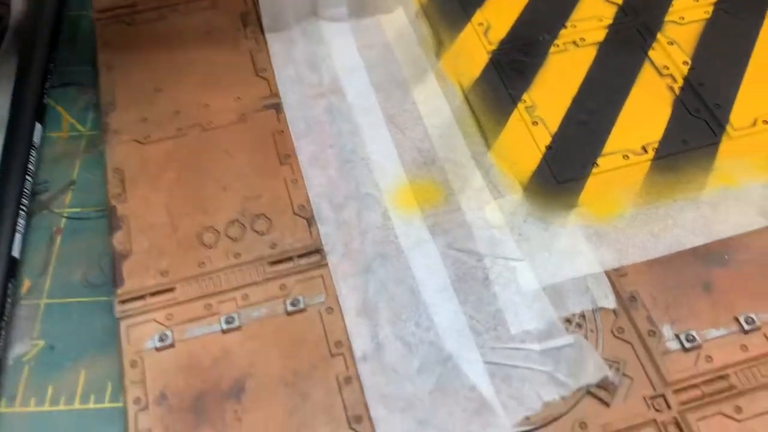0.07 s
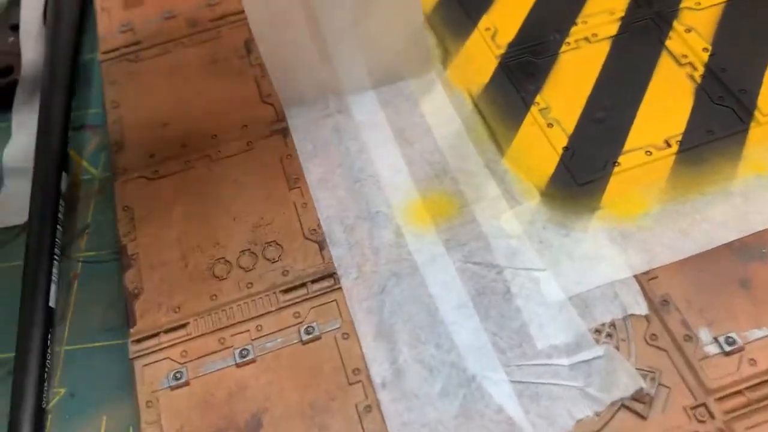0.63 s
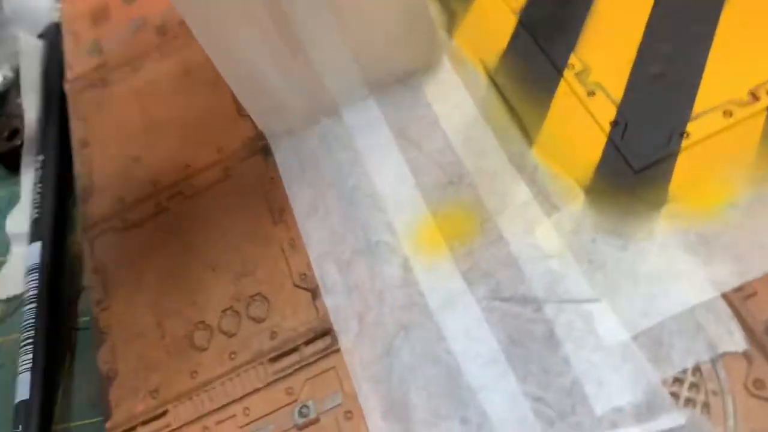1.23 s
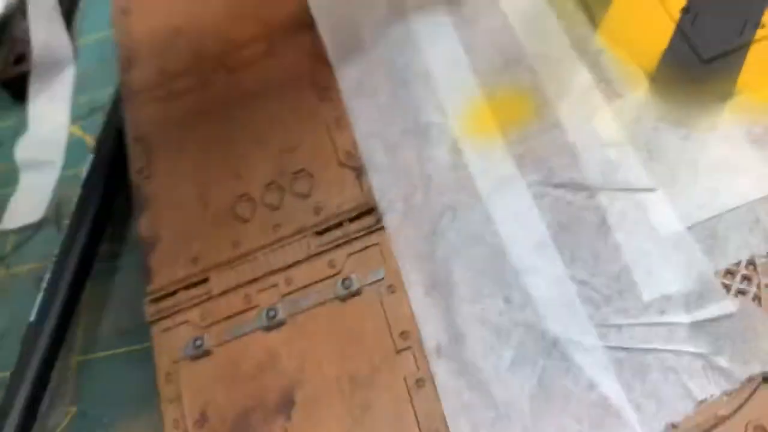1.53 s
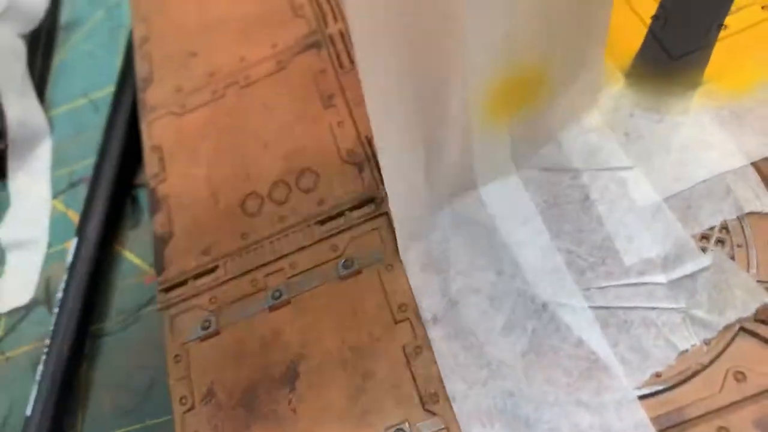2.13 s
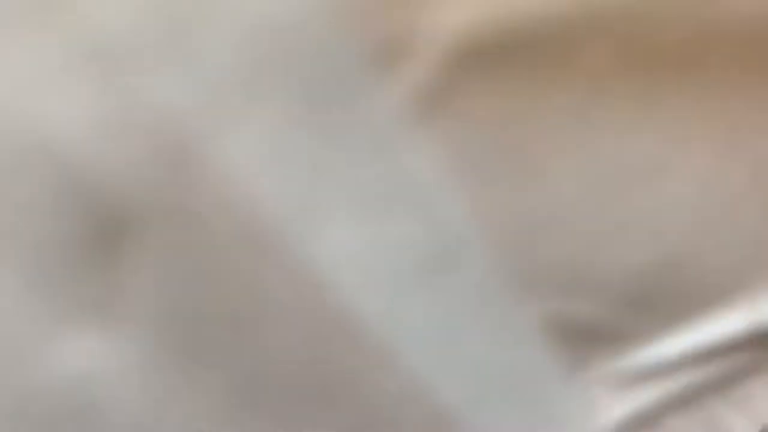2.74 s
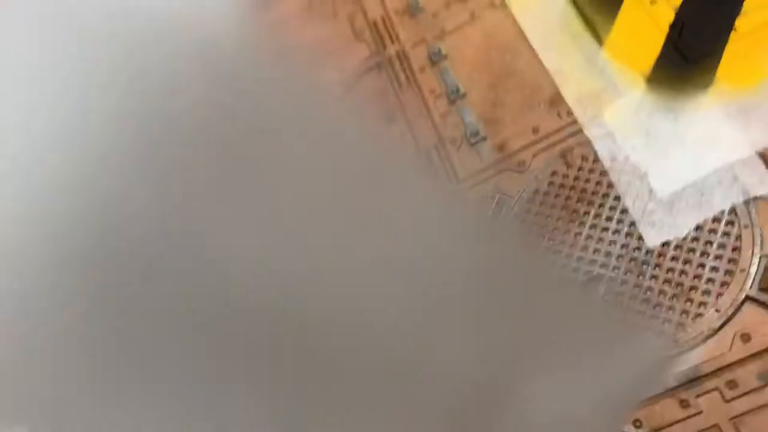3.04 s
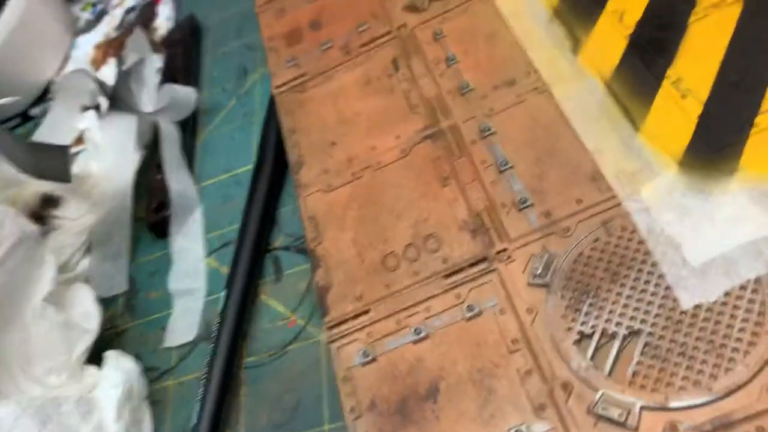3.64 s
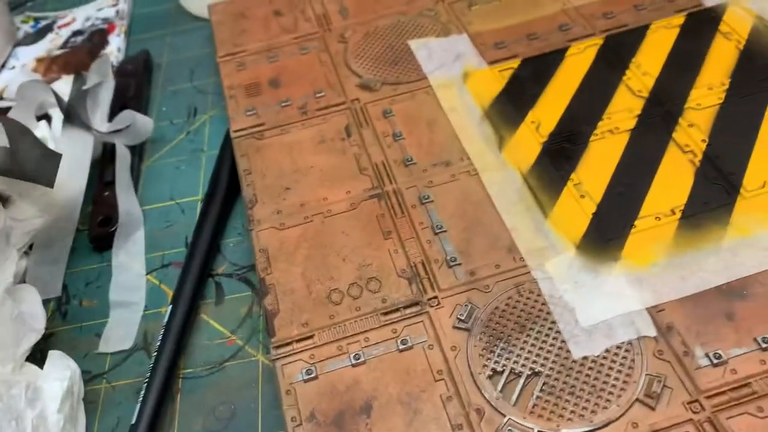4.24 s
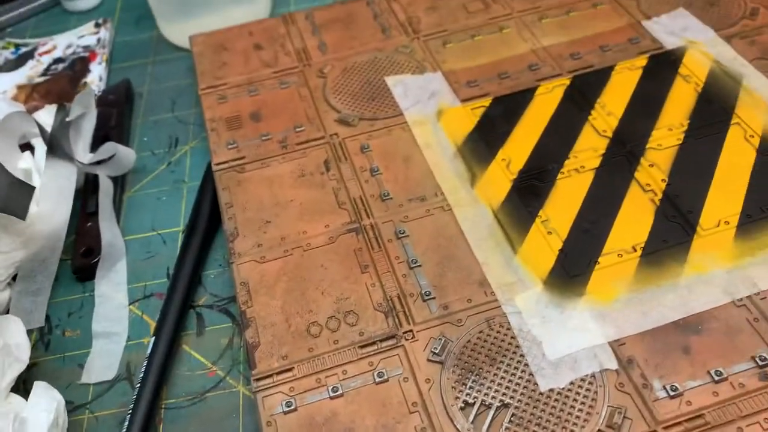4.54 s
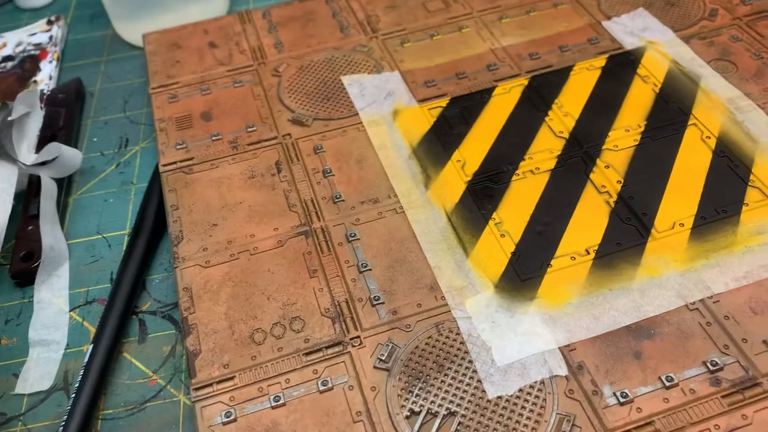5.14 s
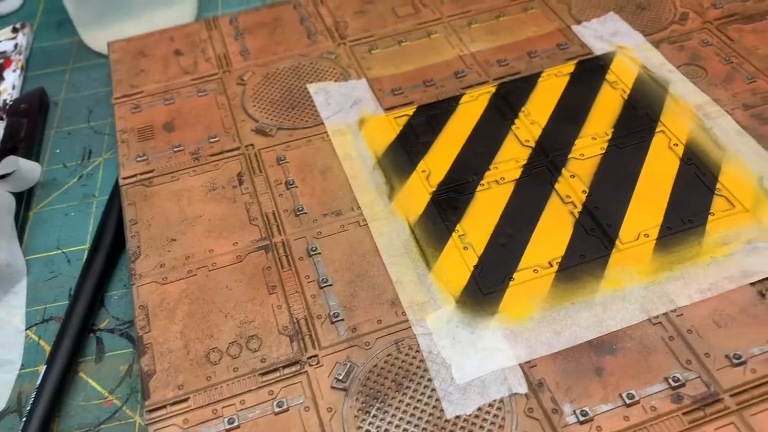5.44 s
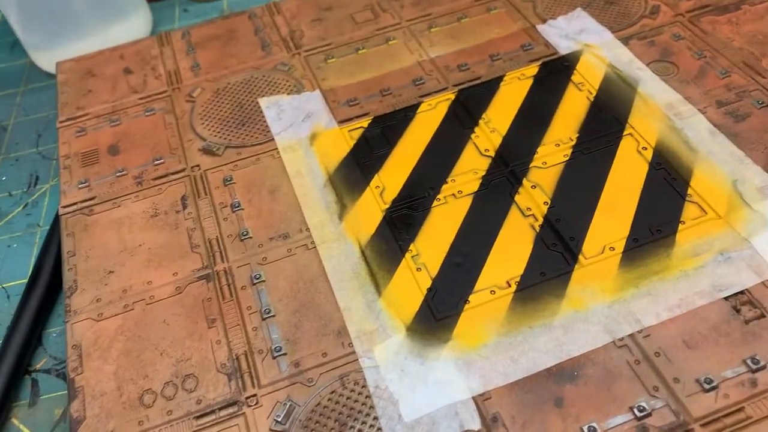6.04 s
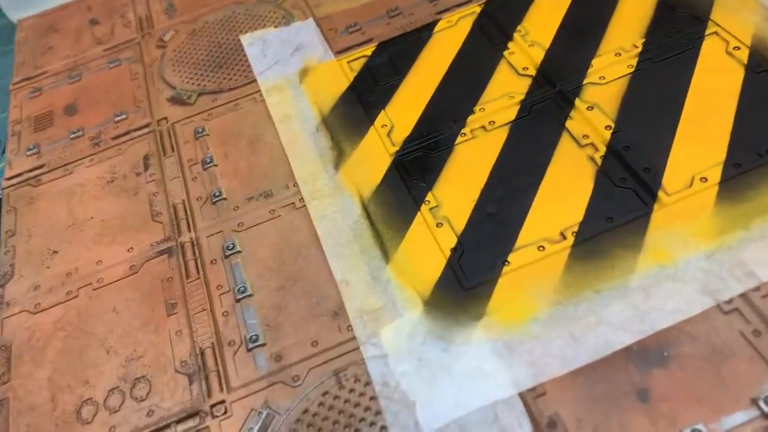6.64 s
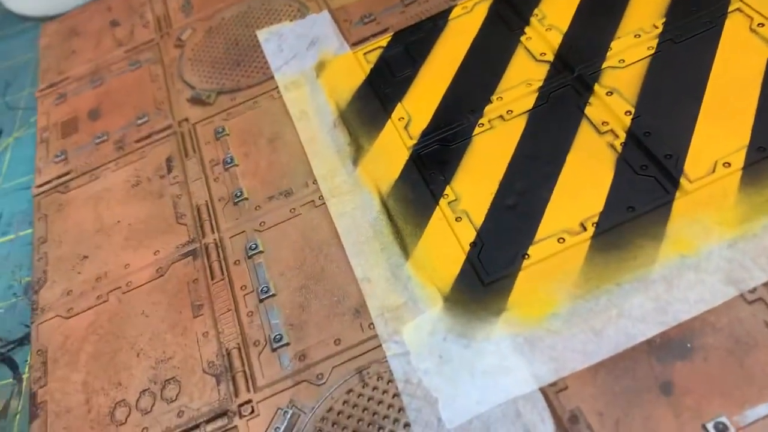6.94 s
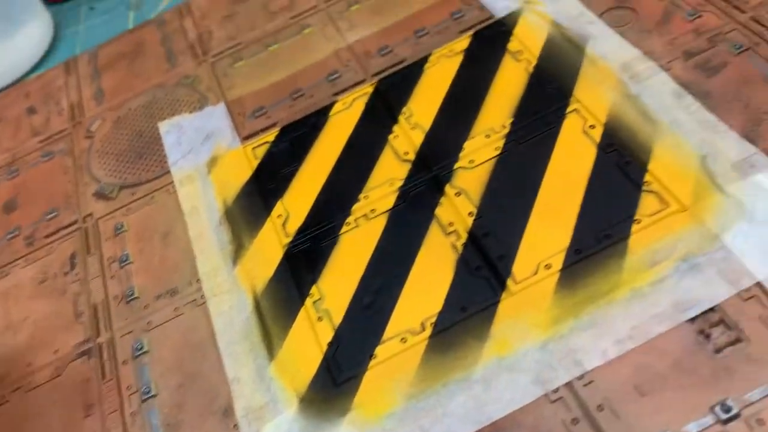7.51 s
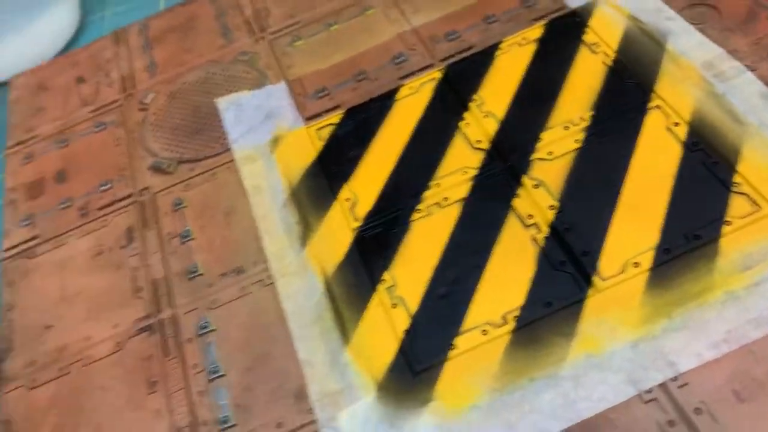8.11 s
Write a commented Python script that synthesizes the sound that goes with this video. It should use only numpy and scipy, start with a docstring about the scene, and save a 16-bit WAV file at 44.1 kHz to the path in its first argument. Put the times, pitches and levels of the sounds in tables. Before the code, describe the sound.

Close to a pair of microphones in a small, dry room, masking tape comes away from a board in uneven, sticky rips that build in strength. It lets go with a low thump, and after a short pause the strip flaps with a sharp slap. Lighter crumpling and ticking of the paper follow. Near the end come quiet fingertip rubs, a tiny squeak and a few light, hollow taps on the board.

```python
"""Wide masking tape is pulled off a painted board: the glue crackles, the tight paper flutters and the
board rings. The strip rips free with a low twang, slaps past two close microphones, then rustles as
it is put aside. Fingers then slide over the board and tap it, in a small, dry room.
Most sounds are noise shaped in loudness and tone; thumps and clear rings are fading sine waves."""
import sys
import numpy as np
from scipy import signal
from scipy.fft import rfft, irfft, next_fast_len
from scipy.io import wavfile
from scipy.ndimage import map_coordinates

SR = 44100
rng = np.random.default_rng(int(sys.argv[2]) if len(sys.argv) > 2 else 0)


def output_pcm(signal):
    """Save a mono or channel-first signal as 16-bit PCM at the path in sys.argv[1].

    Samples are clipped to [-1, 1] before scaling.
    """
    pcm = np.clip(np.atleast_2d(signal).T, -1, 1) * 32767
    wavfile.write(sys.argv[1], SR, np.round(pcm).astype(np.int16))


N = 369116

# Levels are relative within each layer. t is the start time; t60 is the time to fade by 60 dB.
# Pulls on the tape: t/s, length/s, crackle/dB, rasp/dB, flutter/dB
PULLS = [(0, 0.087, -45, -56, -45.5), (0.175, 0.0079, -39.5, -48, -42), (0.213, 0.032, -51.5, -52, -49),
         (0.259, 0.063, -45.5, -45, -41), (0.318, 0.039, -41.5, -68, -52), (0.382, 0.054, -45, -63.5, -61),
         (0.487, 0.062, -39, -41.5, -38.5), (0.594, 0.05, -47, -51.5, -44.5),
         (0.75, 0.057, -59, -64.5, -58), (0.858, 0.017, -61, -46.5, -37), (0.932, 0.11, -55, -59, -42.5),
         (1.146, 0.11, -62, -65.5, -56), (1.218, 0.04, -48.5, -43, -50.5),
         (1.262, 0.059, -41.5, -40.5, -28), (1.31, 0.12, -78, -54.5, -32.5),
         (1.521, 0.098, -39, -38.5, -31), (1.659, 0.052, -38, -38.5, -28.5),
         (1.885, 0.02, -35.5, -34.5, -28), (1.986, 0.059, -39.5, -42.5, -28.5),
         (2.062, 0.019, -34.5, -35.5, -24.5), (2.141, 0.05, -33.5, -39.5, -29),
         (2.222, 0.044, -37, -42, -31), (2.308, 0.0085, -35, -41, -23), (2.368, 0.076, -30, -35.5, -21.5),
         (2.489, 0.0056, -34, -36, -23), (2.494, 0.0079, -26.5, -32.5, -20),
         (2.537, 0.016, -42.5, -33, -22), (2.596, .016, -58.5, -47, -36.5),
         (2.885, 0.027, -62.5, -66, -69.5), (3.104, 0.025, -57, -41.5, -35)]
# Tugs that make the tight tape creak: t/s, length/s, level/dB, f/Hz
CREAKS = [(.01, 0.074, -57.5, 1680), (.18, .025, -51, 1650), (.264, 0.027, -40, 1560),
          (.304, 0.0073, -40, 1750), (.36, 0.11, -65.5, 1650), (.49, 0.046, -50, 1820),
          (.49, .07, -50, 480), (.862, 0.013, -46, 1900), (.862, 0.023, -52, 480), (.972, .004, -49, 1450),
          (1.233, .008, -47.5, 1600), (1.383, 0.0098, -48, 1883), (1.555, 0.0066, -22.5, 1514),
          (7.69, 0.016, -51, 1700)]
# The loudest snaps of glue, creases and fingernails: t/s, level/dB, papery body against that level/dB
SNAPS = [(.002, -24, -8), (.112, -39, 3), (.1605, -17.5, -2), (.184, -16.5, -10), (.2778, -31, 0),
         (.2932, -23.5, -13), (.4773, -29, -6), (.4895, -39, 3), (.5482, -20.5, -0.5), (.5656, -19.5, -3.5),
         (.6444, -20, -25), (.8595, -35, 6.5), (1.0096, -32, -15), (1.2196, -30, -0.5), (1.232, -31, 2.5),
         (1.2595, -29.5, -8), (1.4676, -26, 1.5), (1.5065, -19, -0.5), (1.5259, -27, -18),
         (1.5474, -11.5, -2.5), (1.5853, -17, -5), (1.6586, -19, -8), (1.6705, -24, 0.5), (1.7434, -27, 6),
         (1.8777, -23.5, -5), (1.951, -27, 3), (2.0123, -29, -3.5), (2.0318, -20.5, -1), (2.072, -20, -1),
         (2.0777, -15.5, 2), (2.085, -22.5, -4), (2.1211, -17, -8.5), (2.172, -12, -17), (2.2408, -18, -10),
         (2.3117, -20, 1), (2.3491, -23.5, -8), (2.3626, -20, -11), (2.392, -20, -12),
         (2.4415, -7.5, -15.5), (2.4962, -11, -20), (2.504, -11.5, -18.5), (2.5095, -14, -18),
         (2.5556, -5, -19.5), (2.5592, -13.5, -17), (2.9058, -26, -12), (2.9445, -34, -24.5),
         (2.955, -6, -1), (2.9665, -9, -0.5), (2.9806, -18.5, 8), (3.0345, -29.5, 2), (3.0714, -34, 7),
         (3.0975, -33, 17), (3.121, -42, 10), (3.1617, -42, 15.5), (3.2286, -31.5, -12), (3.5955, -17, 0.5),
         (3.8166, -23.5, -19.5), (3.8355, -24.5, -15.5), (3.857, -30, -3.5), (3.9223, -33, -3),
         (3.9318, -22.5, -15), (3.9495, -23, -11.5), (3.9727, -29, 1), (4.1014, -5.5, -6), (4.2808, -28, 2),
         (4.296, -32, 8), (4.3074, -21.5, 9.5), (4.4237, -21, -5), (4.4334, -20, -7.5), (4.5699, -39, 5.5),
         (4.6302, -23.5, -11), (4.6606, -20.5, -8), (4.6981, -22.5, -16), (4.8911, -35.5, 4),
         (5.1361, -26.5, -20), (5.1565, -42, -12), (5.189, -38, -10), (5.3127, -31, -19),
         (5.3376, -26.5, -1), (5.3626, -30, 0), (5.627, -26.5, -17.5), (5.8, -33.5, -19), (6.7312, -27, 4),
         (6.9155, -39, -6.5), (7.1755, -16.5, -4), (8.1435, -35.5, -5.5), (8.2585, -37, -12)]
# The freed strip slaps and bounces: t/s, level/dB, t60/s
SLAPS = [(2.956, -14, 0.043), (2.9805, -5, 0.052), (3.099, -20.5, 0.062), (3.1615, -31.5, 0.11)]
# Low thumps of the tape and the board: t/s, level/dB, f/Hz, t60/s
THUMPS = [(.291, -20.5, 66, 0.07), (.95, -23.5, 69, 0.057), (1.304, -15.5, 860, 0.0063),
          (1.307, -12, 241, 0.043), (1.316, -6.5, 108, 0.037), (1.335, -27, 70, 0.27),
          (1.335, -31, 194, 0.13), (1.908, -18.5, 210, 0.04), (2.087, -19, 78, 0.072),
          (2.176, -22.5, 120, .12), (2.262, -23, 115, 0.13), (2.458, -21, 90, .05),
          (2.576, -3, 230.8, 0.016), (2.6, -32, 242, 0.11), (2.586, -15.5, 113, 0.095),
          (2.607, -10.5, 57.45, 0.27), (2.912, -26.5, 138, 0.05), (2.983, -13, 136, 0.07),
          (2.991, -17, 70.7, 0.31), (5.208, -47.5, 200, 0.072), (5.235, -46.5, 170, .07),
          (5.801, -53, 298, 0.051), (6.918, -49, 230, 0.062), (6.743, -21, 79.3, 0.075),
          (7.187, -38, 213, 0.086), (7.312, -49, 148, 0.089), (7.741, -41, 140, 0.078),
          (8.155, -34.5, 79.9, 0.095), (8.29, -44.5, 130, 0.093)]
# Squeezes of the loose strip: t/s, length/s, rustle/dB, rasp/dB
SQUEEZES = [(3.24, 0.042, -63, -73.5), (3.36, 0.018, -61.5, -86.5), (3.54, 0.025, -53, -65),
            (3.575, 0.038, -45.5, -60), (3.63, 0.037, -58.5, -61), (3.72, 0.026, -59.5, -69),
            (3.828, 0.061, -48.5, -64), (3.925, 0.084, -51, -65), (4.06, .02, -55, -55.5),
            (4.092, 0.032, -46, -49.5), (4.165, 0.054, -47.5, -56), (4.295, 0.026, -34.5, -46),
            (4.34, 0.048, -43.5, -58.5), (4.45, 0.081, -58.5, -69), (4.576, 0.03, -56, -64),
            (4.665, 0.042, -43, -55.5), (4.775, 0.017, -52.5, -61.5), (4.89, 0.067, -50, -59),
            (5.01, 0.036, -49.5, -62), (5.055, 0.023, -44, -55.5), (5.14, 0.17, -58, -63.5),
            (5.315, 0.08, -52, -56.5), (5.44, 0.069, -57, -65), (5.605, 0.021, -50.5, -54)]
# Runs of buckling creases: t/s, length/s, level/dB
CRINKLES = [(3.588, 0.014, -39), (3.83, .015, -45.5), (3.857, .012, -37), (3.922, 0.019, -41.5),
            (4.322, 0.019, -37), (4.423, 0.012, -37), (4.662, .012, -41.5), (4.698, .008, -43),
            (5.07, .014, -43), (5.11, .09, -58), (5.305, .01, -50), (5.364, 0.0048, -36.5),
            (5.44, .004, -47), (5.46, 0.043, -64), (5.612, .004, -46.5)]
# Blows that ring the board: t/s, level/dB, t60/s
KNOCKS = [(.282, -29.5, 0.022), (.711, -43.5, 0.022), (.744, -38.5, 0.058), (.832, -36, 0.042),
          (.876, -36, .04), (.972, -41, .03), (1.009, -34.5, 0.057), (1.261, -20.5, 0.047),
          (1.303, -32, 0.042), (1.344, -30.5, 0.1), (1.38, -27, 0.015), (1.549, -17.5, 0.08),
          (1.588, -21.5, 0.088), (1.827, -31.5, 0.11), (2.012, -18.5, 0.017), (2.44, -19.5, 0.079),
          (2.49, -29, 0.17), (2.555, -17, 0.043), (4.103, -24.5, 0.025), (4.306, -26, 0.04),
          (5.801, -58, 0.18), (6.499, -40.5, 0.059), (6.541, -47, 0.052), (6.613, -36, 0.04),
          (6.631, -35, 0.029), (6.731, -23, 0.11), (6.757, -32, 0.046), (6.797, -41.5, 0.077),
          (6.917, -49, 0.041), (7.178, -26, 0.043), (7.308, -46.5, 0.072), (8.143, -38.5, 0.059)]
# Small touches that give one clear ring: t/s, level/dB, f/Hz, t60/s
PINGS = [(1.549, -27.5, 1258, 0.1), (1.55, -24, 1475, 0.077), (1.55, -33.5, 805, .16),
         (5.441, -54, 754, 0.055), (5.497, -50, 746, .06), (5.63, -52.5, 750, 0.2), (5.801, -52, 694, 0.09),
         (5.801, -61.5, 770, .16), (6.918, -44.5, 6180, 0.028), (6.918, -50, 7730, 0.017),
         (6.917, -51, 3700, 0.017), (7.176, -16, 2850, 0.015)]
# Fingers sliding on the board: t/s, length/s, hiss/dB, rub/dB, rumble/dB
SLIDES = [(6.33, 0.045, -68.5, -64, -81), (6.385, 0.024, -60.5, -58, -71.5), (6.43, 0.014, -76, -58.5, -59),
          (6.502, 0.067, -68, -56, -63.5), (6.618, 0.021, -62, -46.5, -57.5),
          (6.685, 0.043, -63, -49.5, -55.5), (6.735, 0.018, -56, -35.5, -40.5),
          (6.935, 0.07, -61.5, -56, -59.5), (7.02, 0.09, -64, -61, -87.5), (7.165, 0.035, -58, -42, -49),
          (7.31, 0.056, -73.5, -86, -67), (7.687, 0.0092, -55.5, -41.5, -57),
          (7.74, 0.0084, -58.5, -76, -52.5), (7.79, 0.1, -65, -71.5, -84),
          (8.147, 0.057, -56.5, -61, -57.5), (8.258, 0.0056, -51.5, -55, -65), (8.3, 0.1, -71, -55.5, -59)]
# A fingertip catching on the paint: t/s, length/s, level/dB, f/Hz
CATCHES = [(6.5, 0.011, -58, 2100), (6.613, 0.026, -49, 1377), (6.614, 0.02, -52.5, 2250),
           (6.692, 0.017, -52, 2400), (6.706, 0.026, -43, 1430), (6.711, 0.041, -41.5, 1750),
           (6.733, 0.034, -51, 845)]
# The pitches at which the board rings: f/Hz, width/Hz, level/dB
BOARD_RINGS = [(540, 98, -9.5), (857, 14, -7), (1134, 87, -5), (1217, 160, 6.5), (1440, 39, -8.5),
               (1646, 18, -6), (1594, 100, -3), (1870, 20, -10.5), (2430, 17, -5), (2910, 210, -9.5)]

# The tone of each sound, from bass to treble: f/Hz, level/dB
GLUE_TONE = [(900, -44.5), (2000, -15.5), (3000, -5.5), (4200, 2), (5500, 2.5), (7600, 0), (8300, 6),
             (11500, 1.5), (14000, 4), (15800, -11)]
FLUTTER_TONE = [(22, -44), (45, -0.5), (75, 4.5), (140, 0.5), (220, -1), (330, -6), (500, -14.5),
                (900, -23.5), (2500, -54)]
TAPE_DAMPING = [(400, 0.5), (750, -1), (1700, 1), (2100, -1), (2500, -4.5), (3100, -1.5), (4200, 0.5),
                (9000, 0)]  # stuck-down tape dulls the board's rasp
SNAP_TOP_TONE = [(2500, -11.5), (5000, -5), (7500, 0.5), (9000, 0), (10800, 3), (13400, 0.5), (16000, -7)]
SNAP_BODY_TONE = [(600, -28.5), (1800, -12.5), (2800, -3.5), (4500, 0), (7000, -9.5), (12000, -35)]
PAPER_TONE = [(900, -20.5), (2000, 3.5), (2600, 5), (3000, -4), (3500, 4), (4200, 5.5), (5400, -1.5),
              (6400, 6), (7400, -1.5), (8300, 0.5), (10200, 1), (11900, 1.5), (13200, 4), (14700, -4),
              (15800, -13)]
PAPER_BODY_TONE = [(120, -4), (240, 3.5), (450, 6), (760, 8), (1000, 6), (1300, 8), (1900, -1.5),
                   (2700, -9.5), (4500, -21.5), (9000, -39.5)]
BOARD_RASP_TONE = [(200, -26), (450, 1), (850, 5), (1000, 0.5), (1250, -2.5), (2000, 2.5), (2800, 0.5),
                   (4500, -7.5), (9000, -17.5), (15500, -36.5)]
SKIN_TONE = [(1200, -8.5), (2700, 4.5), (4200, -6.5), (5500, -5), (7200, -2.5), (8300, -1), (10000, -4.5),
             (13500, -3), (15800, -19)]
BACKGROUND_TONE = [(25, -4.5), (55, 9), (120, 3), (300, 2), (800, -13), (2000, -15), (4200, -17),
                   (7000, -21), (11000, -23), (16000, -32)]

# How each source reaches the microphones: f/Hz, left minus right/dB, left ahead by/radians
PEEL_EDGE_AIM = [(1300, 0, .3), (2000, 0, 3), (3000, 0, 4.1), (4200, 1.5, 6.2), (5300, -1.5, 3.2),
                 (6200, 0, 6.1), (8000, 0, 10), (9600, 0, 8.62)]
STRIP_AIM = [(450, -1.5, 0.011), (700, 0, -0.067), (1500, -1, -0.18), (3100, 0, -0.34), (3980, 7.5, -0.048),
             (5400, -1.5, 0.01), (7040, -0.5, 0.035)]
BOARD_AIM = [(250, -2.5, 0.32), (480, 0, 0.13), (784, 0.5, 0.14), (1300, -0.5, 0.63), (1758, -2, 2.5),
             (2600, -0.5, 2), (4600, 2.5, 7.8), (7300, -0.5, 8.1)]
# How alike left and right are: f/Hz, likeness (1 = the same)
LIKENESS = [(60, 1), (250, 0.88), (600, 0.62), (1500, 0.35), (5000, 0.24), (15000, 1)]
# How the two microphones differ in tone: f/Hz, left minus right/dB
LEFT_BIAS = [(120, 2), (250, 2), (600, 4), (1000, 3.5), (2000, 0), (4000, -.5), (5600, -3.5), (7400, 0.5),
             (8200, -8), (9500, 0)]
# How long the room echoes: f/Hz, t60/s
ROOM_DECAY = [(80, .25), (500, 0.36), (3000, 0.18), (12000, 0.42)]

PUT_ASIDE_S = 3.2  # from here on the strip lies on the left
STRIP_LEAD_S, SLAP_LEAD_S = .00036, -.00017  # head start of the left microphone; negative: the right


def peel(crackle_gain, rasp_gain, flutter_gain):
    """Glue threads stick and let go in clumps, which also rasp the board and pluck the tight tape."""
    slips = amp(2.9 * wobble(190))
    fine = grains(rate=750, spread_db=3, life_s=.0003, bed_db=-9)
    coarse = grains(rate=90, spread_db=3, life_s=.0008, bed_db=-22)
    threads = noise(slips * np.hypot(fine, .8 * coarse))
    crackle = amp(2) * crackle_gain * coloured(threads, GLUE_TONE)
    jerks = noise(slips * np.hypot(fine, .52 * coarse))
    rasp = amp(4.5) * rasp_gain * board(coloured(jerks, TAPE_DAMPING), ring_db=-6)
    flutter = amp(-3.5) * flutter_gain * coloured(noise(np.sqrt(slips)), FLUTTER_TONE)
    from_edge = aimed(stereo(paper_ring(crackle, ring_db=0, t60=.062)), PEEL_EDGE_AIM)
    from_board = paper_ring(rasp, ring_db=7, t60=.034) + flutter + creaks()
    return from_edge + aimed(stereo(from_board), BOARD_AIM)


def pull_strength():
    """How strong the crackle, rasp and flutter are over time as the tape is pulled."""
    def layer(column, fall, held_db, creep_db, whip_db, whip_fall):
        rows = [(start, length, levels[column]) for start, length, *levels in PULLS]
        pulls = strokes(rows, rise=1101, fall=fall, sag=20)
        held = strokes([(0, 1.4, held_db)], rise=1101, fall=fall, sag=0)  # faint ticking at first
        creep = strokes([(1.46, 1.11, creep_db)], rise=1101, fall=fall, sag=-2)  # grows between pulls
        whip = strokes([(2.958, .017, whip_db)], rise=2700, fall=whip_fall, sag=0)  # the strip flies free
        return np.linalg.norm([pulls, held, creep, whip], axis=0)[0]
    crackle = layer(0, fall=481.5, held_db=-64.5, creep_db=-50, whip_db=-34, whip_fall=380)
    rasp = layer(1, fall=481.5, held_db=-69.5, creep_db=-51.5, whip_db=-25, whip_fall=212.5)
    # The tape flutters on after the glue stops, so this layer falls more slowly.
    flutter = layer(2, fall=241, held_db=-62.5, creep_db=-38.5, whip_db=-15, whip_fall=194.5)
    return crackle, rasp, flutter


def creaks(width_hz=260, t60=.045):
    """A tug makes the stretched paper creak: rough noise around one pitch."""
    out, t = np.zeros((2, N + SR)), np.arange(SR // 4) / SR
    for start, length, db, hz in CREAKS:
        resonance = signal.iirpeak(hz, hz / width_hz, fs=SR)
        tone = signal.lfilter(*resonance, rng.standard_normal((2, len(t))))
        shape = (1 - np.exp(-t / .002)) * amp(-60 * np.maximum(t - length, 0) / t60)
        out[:, round(start * SR):][:, :len(t)] += amp(db) * shape * unit(tone)
    return out[:, :N]


def snaps(rows, tail_t60=.036):
    """A faint lead-in hiss comes just before each bright crack, with a weaker tail and a papery body."""
    lead_in = bursts([(max(t - .002, 0), db - 22, tail_t60 / 2) for t, db, _ in rows])
    crack = bursts([(t + .00094, db + 1.5, .0054) for t, db, _ in rows])
    tail = bursts([(t, db - 21.5, tail_t60) for t, db, _ in rows])
    body = bursts([(t + .0007, db + body_db - 3, tail_t60 / 5) for t, db, body_db in rows])
    sound = coloured(lead_in + crack + tail, SNAP_TOP_TONE) + coloured(body, SNAP_BODY_TONE)
    return paper_ring(sound, ring_db=-2.5, t60=.034)


def small_snap_rows(activity, per_second=10, boost_db=7, body_db=-9):
    """Smaller snaps come at random times, stronger when the tape is worked harder."""
    times = np.cumsum(-np.log(1 - rng.random(1200)[::2])) / per_second
    return [(t, 20 * np.log10(activity[int(t * SR)]) + boost_db, body_db) for t in times if t < N / SR]


def loose_strip(rustle_gain, rasp_gain):
    """The freed paper slides over itself, buckles at its creases and flaps."""
    creases = amp(2.5 * wobble(83)) * grains(rate=420, spread_db=4, life_s=.0008, bed_db=0)
    rustle = amp(3.5) * rustle_gain * coloured(noise(creases), PAPER_TONE)
    rasp = rasp_gain * coloured(noise(creases), PAPER_BODY_TONE)
    paper = paper_ring(rustle + rasp, ring_db=-1, t60=.024)
    flap = amp(-10.5) * rasp_gain * coloured(noise(1), FLUTTER_TONE)
    return paper + flap


def crinkles():
    """A crumpled patch gives way in a quick run of tiny, dry ticks that ring the stiff paper."""
    gain, = strokes(CRINKLES, rise=3499.5, fall=1500.5, sag=33)
    ticks = gain * noise(grains(rate=450, spread_db=3, life_s=.0005, bed_db=-12))
    sound = coloured(ticks, PAPER_TONE) + amp(-15) * coloured(ticks, PAPER_BODY_TONE)
    return paper_ring(sound, ring_db=2, t60=.03)


def paper_ring(x, ring_db, t60, size=8192):
    """Paper rings at many pitches that change as it bends, so each short stretch gets a new ring."""
    t = np.arange(size // 8) / SR
    x = np.pad(x, ((0, 0), (size, 2 * size)))
    out, fade = np.zeros_like(x), signal.get_window("hann", size)
    for start in range(0, N + size, size // 2):
        ring = rng.standard_normal(len(t)) * amp(-60 * t / t60)
        ring *= amp(ring_db) / np.linalg.norm(ring)
        ring[0] += 1  # the direct sound
        ring /= np.linalg.norm(ring)
        piece = signal.fftconvolve(x[:, start:start + size] * fade, ring[None], axes=1)
        out[:, start:start + piece.shape[1]] += piece
    return out[:, size:size + N]


def board(x, ring_db):
    """The board answers a push with a broad rasp and its own ringing pitches."""
    def rings(f):
        response = sum((-1) ** k * amp(db) * 1j * f * width / (hz * hz - f * f + 1j * f * width)
                       for k, (hz, width, db) in enumerate(BOARD_RINGS))
        return response / np.sqrt(np.mean(abs(response) ** 2))
    return (coloured(x, BOARD_RASP_TONE) + amp(ring_db) * filtered(x, rings)) / np.hypot(1, amp(ring_db))


def knocks(rows):
    """Jerks of the tape and taps of the fingers ring the board."""
    return amp(-3) * board(bursts(rows), ring_db=-3.5)


def jolts(rows):
    """Each jolt leaves one fading tone: a thump if low, a ping if high."""
    out, t = np.zeros(N + SR), np.arange(SR // 2) / SR
    for start, db, hz, t60 in rows:
        shape = amp(db - 60 * t / t60) * (1 - np.exp(-6 * hz * t))
        out[round(start * SR):][:len(t)] += shape * np.sin(2 * np.pi * hz * t)
    return out[:N]


def fingers():
    """Skin drags dully over paint and tape."""
    hiss_gain, rub_gain, rumble_gain = strokes(SLIDES, rise=567, fall=299, sag=27)
    drag = amp(3.2 * wobble(110))
    hiss = amp(2) * hiss_gain * coloured(noise(drag), SKIN_TONE)
    rub = amp(-2.5) * rub_gain * board(noise(drag), ring_db=-6)
    sliding = paper_ring(hiss + rub, ring_db=-4.5, t60=.046)
    rumble = amp(4) * rumble_gain * coloured(noise(1), FLUTTER_TONE)
    return sliding + rumble


def catches(wander_hz=95, t60=.06):
    """Skin catches on the paint and briefly makes the hollow board sing one wavering note."""
    out, t = np.zeros(N + SR), np.arange(SR // 4) / SR
    for start, length, db, hz in CATCHES:
        pitch_hz = hz + wander_hz * wobble(248)[:len(t)]
        flicker_db = 1.86 * wobble(153)[:len(t)]
        shape = (1 - np.exp(-t / .003)) * amp(db + flicker_db - 60 * np.maximum(t - length, 0) / t60)
        out[round(start * SR):][:len(t)] += shape * np.sin(2 * np.pi * np.cumsum(pitch_hz) / SR)
    return out[:N]


def strokes(rows, rise, fall, sag):
    """One loudness curve per level column: each stroke rises, sags while held, then falls (in dB/s)."""
    t, power = np.arange(0, N, 32) / SR, 0
    for start, length, *levels in rows:
        before, after = np.maximum(start - t, 0), np.maximum(t - start - length, 0)
        shape_db = -rise * before - sag * np.clip(t - start, 0, length) - fall * after
        power = power + np.outer(amp(levels), amp(np.maximum(shape_db, -150))) ** 2
    return np.array([np.interp(np.arange(N) / SR, t, np.sqrt(p)) for p in power])


def grains(rate, spread_db, life_s, bed_db):
    """The loudness of tiny random breaks, about rate a second, over a steady bed of finer ones."""
    size = amp(spread_db * np.minimum(rng.standard_normal(N), 2))
    energy = (rng.random(N) < rate / SR) * size ** 2
    power = signal.lfilter([1], [1, -np.exp(-2 / (life_s * SR))], energy)
    return np.sqrt((power / power.mean() + amp(bed_db) ** 2) / (1 + amp(bed_db) ** 2))


def bursts(rows):
    """Noise that jumps up and fades for each row of t/s, level/dB, t60/s."""
    power, t = np.zeros(N + SR), np.arange(SR // 4) / SR
    rise = 1 - np.exp(-t / .0002)
    for start, db, t60 in rows:
        power[round(start * SR):][:len(t)] += (amp(db - 60 * t / t60) * rise) ** 2
    return np.sqrt(power[:N]) * rng.standard_normal((2, N))


def noise(texture):
    """Two unrelated noises whose loudness follows the texture."""
    return unit(texture * rng.standard_normal((2, N)))


def wobble(rate):
    """A smooth random curve through rate points a second."""
    points = np.clip(rng.standard_normal(8192), -1.5, 1.5)
    return map_coordinates(points, [np.arange(N) * rate / SR], mode="wrap")


def amp(db):
    """Turn decibels into a gain."""
    return 10 ** (np.asarray(db) / 20)


def unit(x):
    """Scale a signal to an average power of 1."""
    return x / np.sqrt(np.mean(x ** 2) + 1e-20)


def along(points, hz):
    """Read between rows of f/Hz, value on a logarithmic frequency scale."""
    f, values = np.transpose(points)
    return np.interp(np.log(hz + 1), np.log(f + 1), values)


def filtered(x, response):
    """Change the strength and phase of each frequency f by response(f)."""
    size = next_fast_len(N + SR // 2)
    return irfft(rfft(x, size) * response(np.fft.rfftfreq(size, 1 / SR)), size)[..., :N]


def coloured(x, tone, size=8192):
    """Give a sound the tone in a table, with a filter that rings only after each hit, never before."""
    cepstrum = irfft(np.log(amp(along(tone, np.fft.rfftfreq(size, 1 / SR)))))
    kernel = irfft(np.exp(rfft(2 * cepstrum[:size // 2], size)))
    return signal.oaconvolve(x, kernel[None] / np.linalg.norm(kernel), axes=1)[:, :N]


def stereo(pair, lead_s=0, treble_hz=9150, mic_gap_s=.000295):
    """Make two signals partly alike. The left is lead_s early; above treble_hz the right comes first."""
    def blend(hz):
        angle = np.arccos(np.clip(along(LIKENESS, hz), -1, 1)) / 2
        return np.array([np.cos(angle), np.sin(angle)])
    def delay(hz):
        cycles = lead_s * np.minimum(hz, treble_hz) - mic_gap_s * np.maximum(hz - treble_hz, 0)
        return np.exp(np.outer([1j, -1j], np.pi * cycles))
    mid, side = filtered(pair, blend)
    return filtered(np.array([mid + side, mid - side]), delay)


def aimed(x, aim):
    """The direction of a source makes it louder or earlier at one microphone."""
    hz, db, radians = np.transpose(aim)
    def response(f):
        log_gain = along(np.c_[hz, db], f) * np.log(10) / 20
        phase = along(np.c_[hz, radians], f)
        return np.exp(np.outer([.5, -.5], log_gain + 1j * phase))
    return filtered(x, response)


def room(x):
    """The room adds a short wash of echoes in which each frequency fades at its own speed."""
    hz, t, spectrum = signal.stft(rng.standard_normal((2, SR // 2)), SR, nperseg=256)
    fade = amp(-60 * t / along(ROOM_DECAY, hz)[:, None])
    _, tail = signal.istft(spectrum * fade, SR, nperseg=256)
    tail = np.pad(tail / np.linalg.norm(tail[0]), ((0, 0), (SR // 200, 0)))  # starts 5 ms late
    return signal.fftconvolve(x, tail, axes=1)[:, :N]


def background():
    """A faint, steady, low rush lies under everything."""
    return amp(-74.5) * stereo(coloured(noise(1), BACKGROUND_TONE))


def scene():
    """Mix the close tape, board and fingers with the room and the background."""
    crackle, rasp, flutter = pull_strength()
    rustle, crumple = strokes(SQUEEZES, rise=650, fall=329.5, sag=33)
    all_snaps = SNAPS + small_snap_rows(crackle + rustle)
    glue_snaps = snaps([row for row in all_snaps if row[0] < PUT_ASIDE_S])
    late_snaps = snaps([row for row in all_snaps if row[0] >= PUT_ASIDE_S])
    glue = aimed(stereo(glue_snaps), PEEL_EDGE_AIM)
    paper = loose_strip(rustle, crumple) + crinkles() + late_snaps
    strip = aimed(stereo(paper, STRIP_LEAD_S), STRIP_AIM)
    touches = aimed(stereo(fingers() + knocks(KNOCKS)), BOARD_AIM)
    pings = jolts(PINGS) * amp(4.5 * wobble(280))  # a ring flickers as the contact shifts
    squeaks = catches()
    tape = peel(crackle, rasp, flutter)
    slaps = stereo(knocks(SLAPS), SLAP_LEAD_S)
    close = tape + glue + slaps + strip + touches + pings + squeaks
    return close + jolts(THUMPS) + background() + amp(-26) * room(close)


def record(dry, low_cut_hz=33, top_hz=16000):
    """The two microphones differ in tone; the deepest bass and the highest treble are cut."""
    def microphones(hz):
        balance = amp(np.outer([.5, -.5], along(LEFT_BIAS, hz)))
        return balance / np.sqrt(1 + (hz / top_hz) ** 120)
    low_cut = signal.butter(3, low_cut_hz, "highpass", fs=SR, output="sos")
    return filtered(signal.sosfilt(low_cut, dry), microphones)


dry = scene()
out = record(dry)
output_pcm(out)
```